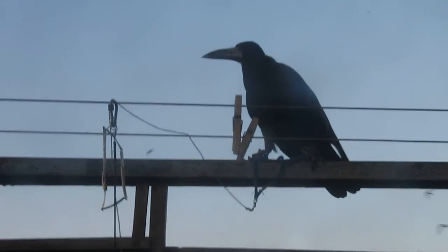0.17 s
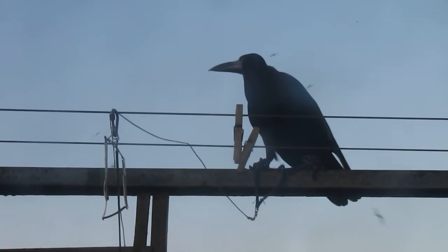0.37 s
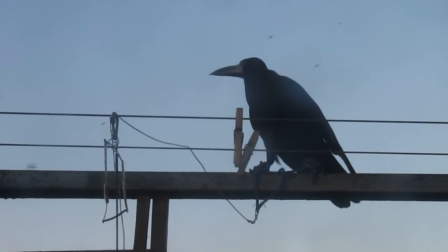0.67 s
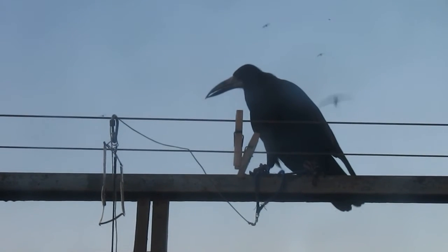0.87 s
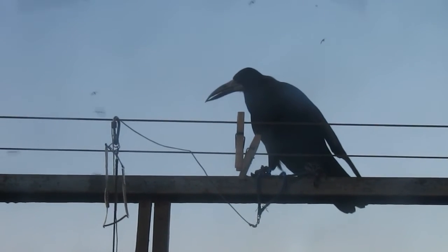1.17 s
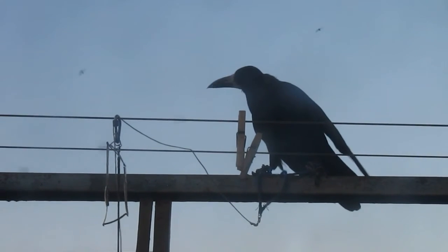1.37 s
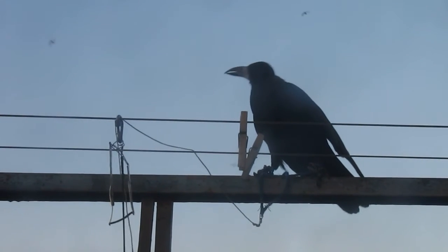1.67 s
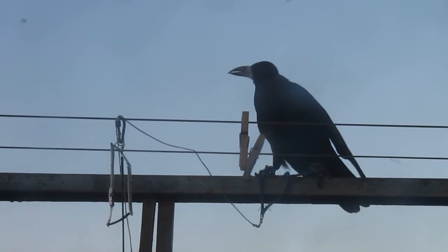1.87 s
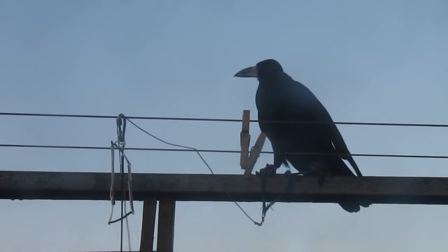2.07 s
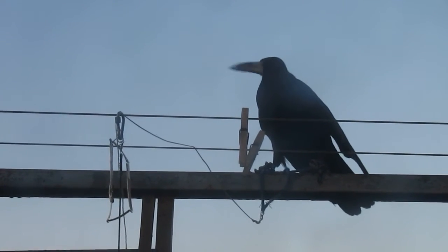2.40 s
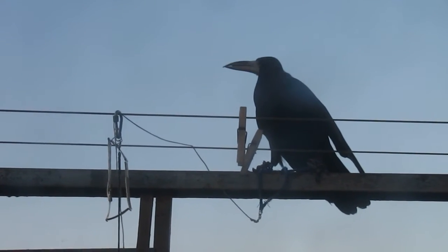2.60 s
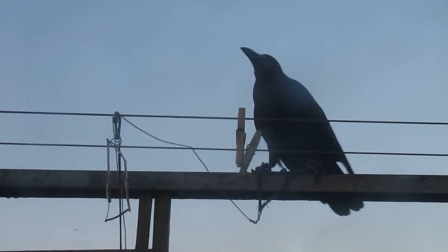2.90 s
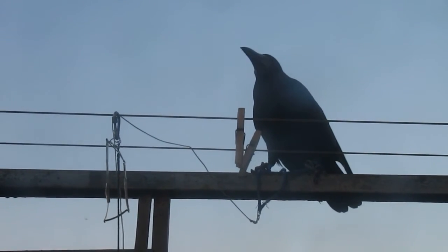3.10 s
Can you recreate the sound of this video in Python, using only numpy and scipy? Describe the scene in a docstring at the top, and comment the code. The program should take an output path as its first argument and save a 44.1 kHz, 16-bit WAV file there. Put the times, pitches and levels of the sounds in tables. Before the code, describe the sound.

Shrill swifts scream around 5-6 kHz, echoing off house walls. A faint distant scream starts at once; quick chips follow at 0.15-0.3 s, then a close scream until 0.5. A stronger rasping arch at 0.85-1.4 ends trilling. Distant cries continue; another close one, 2.15-2.75, trills briefly. Two overlap from 2.9 to the cut-off. Steady town rumble, faint whine, gusty buffeting; microphone thumps from 0.9, sharpest near 1.45.

```python
"""On a balcony a town rumbles steadily with a thin whine, and gusts buffet the microphone as shaped noise.
At once a farther swift screams, and others follow: fluttering whistles that climb to a top pitch and sag.
Soon brief chips and screams come from close by, arching in pitch with a noisy rasp; two break into trills.
House walls throw every bird back as echoes and a diffuse tail; from 0.9 s eddies also thump the microphone.
Near the end two close swifts scream over each other."""
import sys
import numpy as np
from scipy import signal
from scipy.fft import rfft, irfft
from scipy.io import wavfile
from scipy.ndimage import uniform_filter1d

SR = 44100
rng = np.random.default_rng(int(sys.argv[2]) if len(sys.argv) > 2 else 0)


def transcribe(u):
    """Save the signal u as a 16-bit wav file named by the first command-line argument.

    u: samples, shape (n,) or (channels, n), limited to [-1, 1]; the rate is SR.
    q: integer samples, one column per channel.
    """
    v = np.clip(np.atleast_2d(u).T, -1, 1)
    q = np.round(v * 32767).astype(np.int16)
    wavfile.write(sys.argv[1], SR, q)


N = 143325
T = np.arange(N) / SR

# All bird levels below are those at the bird, before the gains to the balcony.
# Steady town bed, spectral outline: frequency_hz, relative_level_db
TOWN_SPECTRUM = [(20, -11.5), (60, 1.5), (130, 0), (250, -13.5), (400, -14.5), (800, -14.5), (1000, -11),
                 (1350, -18), (1650, -16.5), (2300, -21), (3300, -28.5), (4300, -27.5), (5500, -22),
                 (7000, -35), (10500, -36), (13000, -52), (15700, -54)]
# Wind at the microphone, breakpoints before trim: time_s, buffeting_db, deep_rumble_db
GUSTS = [(0.0, -36, -37), (0.235, -34.5, -37.5), (0.304, -34, -43), (0.332, -22, -24), (0.41, -44, -39),
         (0.425, -36.5, -43), (0.5, -36, -29.5), (0.575, -52, -46), (0.655, -30.5, -25),
         (0.704, -19.5, -29), (0.79, -26, -35), (0.885, -24, -25), (1.126, -39, -34.5), (1.14, -17.5, -34),
         (1.274, -16, -35), (1.3, -24, -25), (1.366, -27.5, -36), (1.385, -19.5, -32), (1.555, -34, -30.5),
         (1.595, -22, -36), (1.63, -31.5, -31), (1.719, -27, -37), (1.82, -44.5, -42),
         (1.936, -38.5, -36.5), (1.974, -21, -55), (1.99, -34, -43), (2.025, -22.5, -35.5),
         (2.078, -27, -24.5), (2.116, -20, -30), (2.17, -29, -41.5), (2.271, -22, -33), (2.365, -36, -37.5),
         (2.411, -28, -28), (2.48, -31.5, -35.5), (2.521, -15.5, -29), (2.64, -36.5, -36),
         (2.685, -27, -28.5), (2.78, -31, -51), (2.818, -23, -26), (2.925, -28.5, -42), (2.94, -39, -43),
         (2.97, -28.5, -33), (3.165, -39.5, -38), (3.25, -28, -29.5)]
# Buffeting of the gusts, spectral outline: frequency_hz, relative_level_db
BUFFET_SPECTRUM = [(30, -11), (80, -6.5), (130, 3), (220, -2.5), (330, -11), (500, -21), (800, -49),
                   (1500, -101)]
# Deep rumble of the gusts, spectral outline: frequency_hz, relative_level_db
DEEP_SPECTRUM = [(10, -42), (25, -9.5), (60, 0.5), (90, 1.5), (140, -23.5), (300, -48.5)]
# Sharp eddies of strong gusts, spectral outline: frequency_hz, relative_level_db
EDDY_SPECTRUM = [(100, 3), (250, -4), (380, -6), (600, -10), (900, -24), (1500, -35), (3000, -63)]
# Hiss in the swifts' voice, spectral outline: frequency_hz, relative_level_db
RASP_SPECTRUM = [(2500, -18), (3700, -4), (4600, -4.5), (5800, -1), (7000, 0.5), (8300, -2), (9500, -9),
                 (10900, -8.5), (11900, -15), (15000, -39)]
# Farther swifts, one scream a row: start_s, length_s, top_pitch_hz, whistle_db, octave_db, flutter_amount
FAR_SCREAMS = [(-.05, 0.18, 5320, -51, -73, 0.4), (0.335, .15, 6590, -47.5, -80, 1.2),
               (0.509, .15, 5090, -46, -73, .8), (.68, 0.12, 5640, -53.5, -61, 0.2),
               (1.157, .2, 5270, -47, -70, 0.65), (1.386, 0.12, 5360, -48.5, -82, 0.47),
               (1.46, 0.13, 5520, -49, -64, 0.06), (1.548, 0.16, 4990, -48.5, -68, .5),
               (1.72, .15, 4834, -50, -60, 0.6), (1.798, 0.23, 6620, -52, -85, 1.06),
               (1.865, 0.12, 5550, -50, -70, .8), (1.959, .18, 6060, -47, -74, .6),
               (2.019, .12, 5630, -48, -79, .6), (2.33, .14, 4845, -44, -60, 0.83),
               (2.449, 0.14, 5820, -40, -73, .8), (3.067, .15, 5230, -41.5, -58, 0.25)]
# Short chips close by: centre_s, pitch_hz, whistle_db, octave_db, half_tone_db (the voice doubles its period)
CHIPS = [(.141, 5270, -42.5, -59, -72), (.173, 5300, -42, -57, -72), (.238, 5000, -43, -56, -47),
         (.258, 5200, -48, -56, -42), (.285, 5320, -45, -56, -45), (.544, 5050, -45, -68, -44.5),
         (0.575, 5450, -46, -68, -49), (.608, 5300, -49, -66, -48), (2.21, 6030, -42, -70, -72),
         (2.236, 5890, -34, -70, -72), (2.628, 5760, -25, -47, -72)]
# Close swifts, one curve a scream: time_s, pitch_hz, whistle_db, octave_db, rasp_db, flutter_amount
CLOSE_SCREAMS = [
    [(.2, 4240, -47, -54, -68, .2), (.222, 4750, -39, -40, -60, 0.65), (.255, 5100, -37, -45, -55, 0.7),
     (.29, 5245, -29.5, -47, -55, 0.3), (.345, 5424, -38, -61, -44.5, 0.47),
     (.42, 5520, -41, -66, -52, 1.1), (.5, 5650, -51, -73, -62, 1.2)],
    [(.834, 5020, -38, -59, -70, 0.17), (.865, 5570, -31.5, -57, -70, .05),
     (.91, 6020, -36, -53, -65, 0.24), (.98, 6360, -31, -53, -69, 0.44),
     (1.06, 6460, -35.5, -53, -48.5, 0.86), (1.195, 6494, -33.5, -53, -43.5, 0.78),
     (1.215, 6350, -30.5, -45, -44, 0.36), (1.305, 6030, -36, -62, -56, 1),
     (1.335, 5580, -40.5, -74, -46.5, 0.8), (1.38, 5300, -47, -75, -53, 1)],
    [(2.16, 5386, -42, -70, -46, 0.54), (2.225, 5620, -39, -71, -60, 0.36),
     (2.3, 5604, -43, -62, -55, 0.64), (2.345, 5530, -31.5, -44, -49.5, 0.3),
     (2.43, 5120, -36, -53, -43, 0.77), (2.51, 5320, -33.5, -57, -44.5, 0.86),
     (2.595, 5560, -33, -47.5, -46, .8), (2.63, 5740, -29, -51, -45, 0.27),
     (2.65, 5310, -37, -63, -53, 0.66), (2.68, 4770, -40, -52, -51, 1), (2.76, 4950, -48.5, -66, -50, 1.1)],
    [(2.885, 4780, -37, -54, -58, 0.19), (2.908, 5076, -29.5, -51.5, -53, 0.2),
     (2.95, 5200, -35, -56, -53, 0.55), (3.03, 5330, -38, -64, -64, 0.81),
     (3.1, 5450, -41.5, -71, -62, 0.82), (3.2, 5690, -38.5, -66, -59, 0.94),
     (3.25, 5470, -34.5, -58, -50, 0.45)],
    [(2.865, 5400, -40, -58, -60, 0.15), (2.895, 5730, -43.5, -64, -73, 0.04),
     (2.96, 5960, -45, -62, -62, 0), (3.05, 5913, -39, -62.5, -66, 0.32), (3.14, 6090, -42, -67, -64, 0.6),
     (3.21, 6160, -39, -69, -55, .8), (3.25, 6120, -42, -66, -52, 0.84)],
]
# Where the close screams break into pulses: start_s, end_s, depth (0-1)
TRILLS = [(1.185, 1.38, 0.82), (2.644, 2.763, 0.3)]
# Single echoes of nearby walls: delay_s, level_db
ECHOES = [(.0045, -10.5), (0.014, -10), (.029, -16.5), (.058, -14.5)]
# Single eddies thumping the microphone: centre_s, peak_db, width_s
THUMPS = [(0.883, -14, 0.0013), (1.274, -20, 0.0013), (1.382, -12.5, 0.0011), (1.4548, -5.5, 0.00066),
          (2.035, -13, 0.0012), (2.532, -14, 0.00078), (2.675, -19, 0.0012)]

TOWN_DB, WHINE_DB = -40, -66  # rms
WHINE_HZ, WHINE_WAVER_HZ = 7870, 24.9  # mean pitch, rms waver
BUFFET_TRIM_DB, DEEP_TRIM_DB, LUMPY_DB = -1, 2.5, 4
STRONG_GUST_DB, EDDY_DB = -24, -13.5  # reference gust before trim, eddies relative to it
EDDY_GROWTH = 1.42  # dB of eddies per dB of gust

FLUTTER_HZ, FLUTTER_RATE_SPREAD = 273, .08  # mean rate, relative rms
# Swings at a flutter amount of 1
FLUTTER_SWING_HZ, JITTER_HZ, FLUTTER_DEPTH = 278, 85, .5
WANDER_HZ = 26  # rms
FAR_SAG, FAR_RASP_DB, FAR_EDGE_S = 0.11, -13, 0.024  # share of top pitch, relative to whistle, fade time
FAR_UNEVEN_DB, CLOSE_UNEVEN_DB = 3.2, 2.2
CHIP_S, CHIP_JITTER_HZ = .024, 130  # length, rms
TRILL_HZ = 40.2  # pulses per second

DIRECT_DB = -4.5  # gain of the birds' direct sound and single echoes
STREET_T60_S, STREET_BUILD_S = .5, 0.061
CLOSE_STREET_DB, FAR_STREET_DB = -13.5, -8.5
BIRD_TREBLE_HZ, RECORDER_EDGE_HZ = 12500, 15750


def amp(db):
    """Decibels to gain."""
    return 10 ** (np.asarray(db) / 20)


def unit(x):
    """Scales to rms 1."""
    return x / np.sqrt(np.mean(x ** 2) + 1e-20)


def noise(spectrum):
    """Steady noise of rms 1 with the given spectral outline and nothing above it."""
    hz, db = np.transpose(spectrum)
    log_f = np.log(np.fft.rfftfreq(N, 1 / SR) + 1)
    outline_db = np.interp(log_f, np.log(hz), db, right=-np.inf)
    return unit(irfft(rfft(rng.standard_normal(N)) * amp(outline_db), N))


def drift(rate_hz):
    """Smooth random motion of rms 1, weak above a rate."""
    f = np.fft.rfftfreq(N, 1 / SR)
    return unit(irfft(rfft(rng.standard_normal(N)) / (1 + (f / rate_hz) ** 4), N))


def steadied(x, size=1800):
    """Evens out the slow swells of a noise, so that the gusts set its level."""
    power = abs(uniform_filter1d(x ** 2, size))
    return x / np.sqrt(power + 1e-3)


def town():
    """Distant traffic as steady noise, with a faint, thin whine that wavers in pitch."""
    whine_hz = WHINE_HZ + WHINE_WAVER_HZ * drift(150)
    whine = np.sqrt(2) * np.sin(2 * np.pi * np.cumsum(whine_hz) / SR)
    return amp(TOWN_DB) * noise(TOWN_SPECTRUM) + amp(WHINE_DB) * whine


def wind():
    """Lumpy turbulence on the microphone; strong gusts shed sharper eddies."""
    s, buffet_db, deep_db = np.transpose(GUSTS)
    gust_db = np.interp(T, s, buffet_db)
    rumble_db = np.interp(T, s, deep_db)
    lumps = amp(LUMPY_DB * drift(78))
    body = steadied(noise(BUFFET_SPECTRUM) * lumps) * amp(gust_db + BUFFET_TRIM_DB)
    # Eddies rise faster than the gust that sheds them
    eddy_db = STRONG_GUST_DB + EDDY_DB + EDDY_GROWTH * (gust_db - STRONG_GUST_DB)
    eddies = unit(noise(EDDY_SPECTRUM) * lumps) * amp(eddy_db)
    rumble = steadied(noise(DEEP_SPECTRUM)) * amp(rumble_db + DEEP_TRIM_DB)
    return body + eddies + rumble


def syrinx():
    """Irregularities of the voice: fast flutter, jitter, slow wander, uneven effort and rasp."""
    flutter_hz = FLUTTER_HZ * (1 + FLUTTER_RATE_SPREAD * drift(30))
    flutter = np.sin(2 * np.pi * np.cumsum(flutter_hz) / SR)
    jitter, wander = drift(406), drift(48.5)
    effort = np.clip(drift(82), -2, 2)
    return np.array([flutter, jitter, wander, effort, noise(RASP_SPECTRUM)])


def scream(voice, hz, whistle_db, octave_db, rasp_db, rough, uneven_db):
    """A whistle with its octave and a hissing rasp; flutter shakes its pitch and level."""
    at = rng.integers(N - len(hz))  # a random stretch of the voice
    flutter, jitter, wander, effort, rasp = voice[:, at:at + len(hz)]
    shake_hz = rough * (FLUTTER_SWING_HZ * flutter + JITTER_HZ * jitter)
    phase = 2 * np.pi * np.cumsum(hz + shake_hz + WANDER_HZ * wander) / SR
    tone = amp(whistle_db) * np.sin(phase) + amp(octave_db) * np.sin(2 * phase)
    level = unit(amp(uneven_db * effort)) * (1 + FLUTTER_DEPTH * rough * flutter)
    return level * (np.sqrt(2) * tone + amp(rasp_db) * rasp)


def far_swifts(voice):
    """Distant screams: each climbs to its top pitch and sags a little."""
    out = np.zeros(N)
    for start, length, top_hz, whistle_db, octave_db, rough in FAR_SCREAMS:
        on = (T >= start) & (T < start + length)
        u = (T[on] - start) / length
        hz = top_hz * (1 - FAR_SAG * abs(1 - u / 0.72) ** 2.8)  # top at 72 % of the length
        edge_s = np.minimum(u, 1 - u) * length
        gate = np.sqrt(np.clip(edge_s / FAR_EDGE_S, 0, 1))
        rasp_db = whistle_db + FAR_RASP_DB
        out[on] += gate * scream(voice, hz, whistle_db, octave_db, rasp_db, rough, FAR_UNEVEN_DB)
    return out


def chips():
    """Brief squeaks close by, some with a partial halfway to the octave."""
    out = np.zeros(N)
    jitter = CHIP_JITTER_HZ * drift(360)
    for s, hz, whistle_db, octave_db, half_db in CHIPS:
        on = abs(T - s) < CHIP_S / 2
        phase = 2 * np.pi * np.cumsum(hz + jitter[on]) / SR
        tone = amp(whistle_db) * np.sin(phase) + amp(octave_db) * np.sin(2 * phase)
        tone += amp(half_db) * np.sin(1.5 * phase)
        swell = np.cos(np.pi * (T[on] - s) / CHIP_S)
        out[on] += np.sqrt(2) * swell * tone
    return out


def close_swifts(voice, attack_s=0.0013, release_s=0.022, trill_attack_s=0.0012):
    """Close screams on drawn curves; trills chop them into pulses that start sharply and die away."""
    out = np.zeros(N)
    for curve in CLOSE_SCREAMS:
        s, *controls = np.transpose(curve)
        on = (T >= s[0]) & (T < s[-1] + release_s)
        t = T[on]
        rise = np.clip((t - s[0]) / attack_s, 0, 1)
        fall = np.clip(1 - (t - s[-1]) / release_s, 0, 1)
        settings = [np.interp(t, s, c) for c in controls]
        out[on] += rise * fall * scream(voice, *settings, CLOSE_UNEVEN_DB)
    for start, end, depth in TRILLS:
        on = (T >= start) & (T < end)
        u = (T[on] - start) * TRILL_HZ % 1  # position within each pulse
        pulse = np.minimum(u / TRILL_HZ / trill_attack_s, 1) * np.exp(-(2 * u) ** 4)
        out[on] *= unit(1 - depth + depth * pulse)
    return out


def walls(x):
    """Adds single delayed echoes from the nearest walls."""
    return x + sum(amp(db) * np.pad(x, (int(s * SR), 0))[:N] for s, db in ECHOES)


def street(x):
    """Diffuse tail between the houses: noise that builds up and then decays."""
    t = T[:SR]
    decay = amp(-60 * t / STREET_T60_S)
    tail = rng.standard_normal(SR) * decay * (1 - np.exp(-t / STREET_BUILD_S))
    return signal.fftconvolve(x, tail / np.linalg.norm(tail))[:N]


def soften_treble(x):
    """Softens the highest treble of the birds."""
    f = np.fft.rfftfreq(N, 1 / SR)
    return irfft(rfft(x) / np.sqrt(1 + (f / BIRD_TREBLE_HZ) ** 16), N)


def thumps():
    """Each passing eddy pushes and then pulls on the microphone."""
    out = np.zeros(N)
    for s, db, width in THUMPS:
        u = (T - s) / width
        push = -u / (1 + u ** 2 / 2) ** 2.8
        out += amp(db) * push / push.max()
    return out


def scene():
    """The balcony: birds between the walls, wind on the microphone, town beyond."""
    voice = syrinx()
    close = close_swifts(voice) + chips()
    far = far_swifts(voice)
    direct = amp(DIRECT_DB) * walls(close + far)
    diffuse = street(amp(CLOSE_STREET_DB) * close + amp(FAR_STREET_DB) * far)
    return (soften_treble(direct + diffuse) + wind() + thumps() + town())[None]


def record(dry):
    """The recorder's band limit, a steep low-pass."""
    lowpass = signal.firwin(511, RECORDER_EDGE_HZ, window=("kaiser", 9), fs=SR)
    return signal.oaconvolve(dry, lowpass[None], "same")


dry = scene()
out = record(dry)
transcribe(out)
```